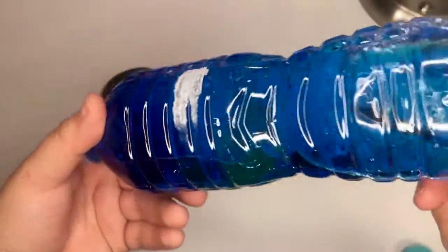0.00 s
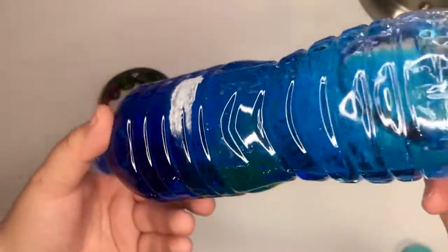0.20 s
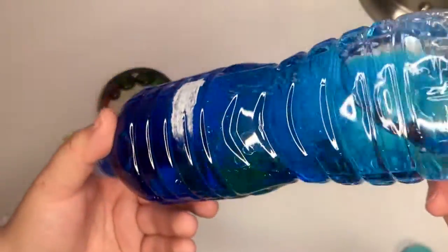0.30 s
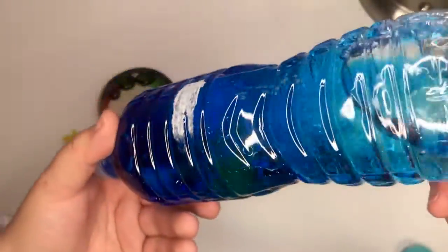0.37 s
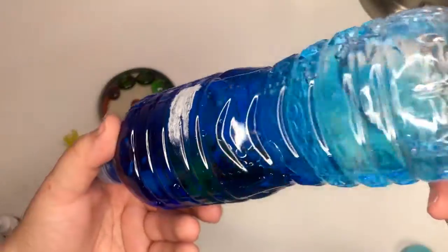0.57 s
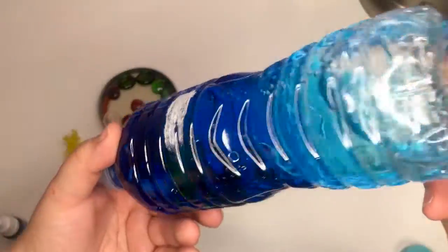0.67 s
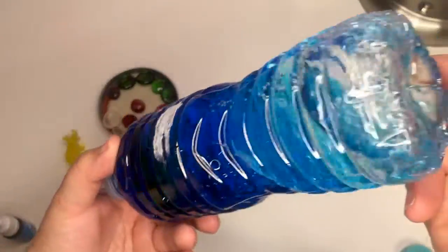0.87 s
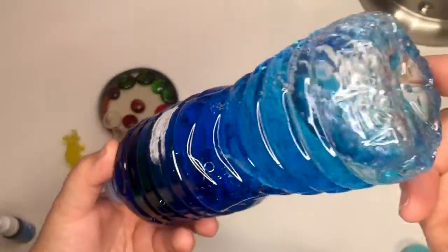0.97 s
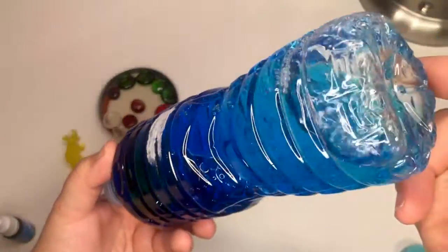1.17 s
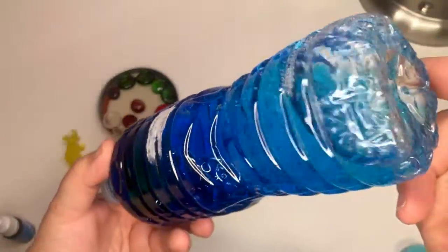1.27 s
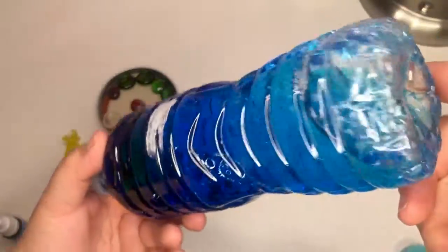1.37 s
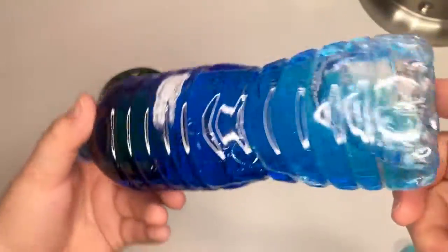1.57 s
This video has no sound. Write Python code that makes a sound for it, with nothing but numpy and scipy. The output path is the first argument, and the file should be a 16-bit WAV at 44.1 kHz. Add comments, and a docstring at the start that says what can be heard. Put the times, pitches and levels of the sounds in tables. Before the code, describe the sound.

A water-filled plastic bottle is tipped, its pebbles rattling down the ribbed wall in one quick burst

```python
"""A mains hum over broad room noise is heard first; then a water-filled plastic bottle is tilted by hand
above a table, and pebbles slide down its ribbed wall. Random contacts excite its damped modes as a rumble.
Noise bursts ring resonances of the wall as dull knocks and low bumps; cracks of noise with a short ring
are the bright clacks. Impulses in the deepest mode are heavy thumps, and a diffuse tail follows the hits."""
import sys
import numpy as np
from scipy import signal
from scipy.fft import rfft, irfft
from scipy.io import wavfile
from scipy.ndimage import uniform_filter1d

SR = 44100
rng = np.random.default_rng(int(sys.argv[2]) if len(sys.argv) > 2 else 0)


def ratio(d):
    """dB to gain"""
    e = np.asarray(d, float) / 20
    return 10 ** e


def file_out(sig):
    """Save sig as 16-bit WAV at sys.argv[1]."""
    # one column per channel
    cols = np.atleast_2d(sig).T
    # limit, then scale
    lim = np.clip(cols, -1, 1)
    pcm = np.round(lim * 32767).astype(np.int16)
    wavfile.write(sys.argv[1], SR, pcm)


N = 70560  # samples, 1.6 s


def rms_one(x):
    """Normalization: scales a signal to unit root-mean-square."""
    return x / np.sqrt(np.mean(x ** 2) + 1e-20)


def cut(x, hz, kind, order=2):
    """Butterworth filtering: a maximally flat passband above or below a corner."""
    return signal.sosfilt(signal.butter(order, hz, kind, fs=SR, output="sos"), x)


def ring(drive, hz, t60):
    """Damped resonance: a unit click sets a decaying sine of height 1 ringing."""
    radius = ratio(-60 / (t60 * SR))
    angle = 2 * np.pi * hz / SR
    poles = [1, -2 * radius * np.cos(angle), radius * radius]
    return signal.lfilter([0, np.sin(angle)], poles, drive + 1e-18)


def add(out, s, sound):
    """Superposition: adds a sound from its onset, cut off at the end of the scene."""
    i = int(s * SR)
    out[i:i + len(sound)] += sound[:N - i]


# Spectrum of the room noise, interpolated over log frequency: (f/Hz, relative level per Hz/dB)
ROOM_SPECTRUM = [(15, -19), (25, -4.5), (70, -6), (124, -10.5), (172, -14), (339, -18.5), (433, -22.5),
                 (1830, -37), (16500, -44)]
ROOM_DB = -55.5  # rms
HUM_HZ, HUM_DB = 119.53, -53.5  # dB: rms of the steady tone
HUM_WIDTH_HZ, HUM_ROUGH = 20, 0.34  # half-width of the noise about the tone, its rms relative to the tone


def room():
    """Stationary background: spectrally shaped noise and a hum, a sine plus narrow-band noise."""
    hz = np.fft.rfftfreq(N, 1 / SR) + 1  # 1 Hz up, to keep the logarithm finite
    point_hz, point_db = np.transpose(ROOM_SPECTRUM)
    shape = ratio(np.interp(np.log(hz), np.log(point_hz), point_db))
    air = irfft(rfft(rng.standard_normal(N)) * shape, N)
    resonance = 1 + ((hz - HUM_HZ) / HUM_WIDTH_HZ) ** 2
    waver = irfft(rfft(rng.standard_normal(N)) / resonance, N)
    tone = np.sqrt(2) * np.sin(2 * np.pi * HUM_HZ * np.arange(N) / SR)
    hum = tone + HUM_ROUGH * rms_one(waver)
    return ratio(ROOM_DB) * rms_one(air) + ratio(HUM_DB) * hum


def grains(per_s, spread_db):
    """Random point process: clicks of uneven size and sign at a mean rate."""
    size = ratio(spread_db * np.minimum(rng.exponential(1, N), 4))
    sign = rng.choice([-1, 1], N)
    return size * sign * (rng.random(N) < per_s / SR)


def dealt(clicks, low_hz, high_hz, cycles, count):
    """Resonator bank: each click rings at one of several pitches for a few cycles."""
    choice = rng.integers(0, count, N)
    pitches = np.geomspace(low_hz, high_hz, count)
    return sum(ring(clicks * (choice == k), hz, cycles / hz) for k, hz in enumerate(pitches))


# Modes of the bottle: (f/Hz, relative level/dB, t60/s)
BOTTLE_MODES = [(466, 4.5, 0.039), (658, 3.5, 0.035), (772, -3, 0.03), (1000, 6.5, 0.014), (1173, 1, 0.017),
                (1368, 2.5, 0.014), (1608, -4, 0.023)]
# Deep modes of the water-laden bottle, the deepest first: (f/Hz, relative level/dB, t60/s)
DEEP_MODES = [(173.8, 2.5, 0.1), (319.6, -5, 0.13)]


def bottle(clicks, modes):
    """Modal superposition: each contact excites every mode with a strength of its own."""
    return sum(ratio(db) * ring(clicks * rng.standard_normal(N), hz, t60) for hz, db, t60 in modes)


# Rms levels of the sliding pebbles, interpolated over time:
# (t/s, rumble level/dB, deep-mode level/dB, small-knock level/dB, tick level/dB)
SLIDE_LEVELS = [(0.059, -78, -62, -68.5, -82), (0.132, -63.5, -79, -66.5, -75),
                (0.191, -65, -84, -62.5, -71), (0.208, -46, -70, -52.5, -82), (0.276, -47, -52, -52, -63.5),
                (0.388, -44, -47.5, -50, -61.5), (0.626, -42, -49, -48, -62), (0.722, -39, -40, -52, -50.5),
                (0.766, -42.5, -53.5, -70, -44.5), (0.824, -35.5, -45.5, -53, -53),
                (0.85, -49.5, -54, -52, -47), (0.916, -43.5, -53.5, -66, -50),
                (0.992, -61, -60.5, -87, -66.5), (1.03, -45.5, -63, -53.5, -72),
                (1.081, -60, -60, -97, -64)]
RUMBLE_PER_S, KNOCKS_PER_S, TICKS_PER_S = 600, 800, 4000  # mean contact rates


def slide():
    """Stochastic excitation: dense contacts rumble in the modes; small knocks and ticks ride on them."""
    s, *columns = np.transpose(SLIDE_LEVELS)
    t = np.arange(N) / SR
    low, deep, mid, high = [ratio(np.interp(t, s, c, left=-99, right=-99)) for c in columns]
    contacts = grains(RUMBLE_PER_S, spread_db=2.5)
    rumble = low * rms_one(cut(bottle(contacts, BOTTLE_MODES), 328, "high"))
    rumble += deep * rms_one(cut(bottle(contacts, DEEP_MODES), 160, "high"))
    small = dealt(grains(KNOCKS_PER_S, spread_db=3.5), 2460, 3620, cycles=9.0, count=24)
    ticks = dealt(grains(TICKS_PER_S, spread_db=1.5), 4200, 11200, cycles=6.0, count=24)
    patter = mid * rms_one(small) + high * rms_one(cut(ticks, 3000, "high"))
    return rumble, patter


TAIL_DB, TAIL_T60_S, TAIL_HZ = -34.5, 0.095, 7160  # initial gain on the noise, decay, treble corner


def surroundings(x):
    """Diffuse reverberation: convolution with decaying noise for the table and walls."""
    t = np.arange(int(.15 * SR)) / SR
    noise = cut(rng.standard_normal(len(t)), TAIL_HZ, "low", order=1)
    noise = cut(noise, 193, "high")
    decay = ratio(TAIL_DB - 60 * t / TAIL_T60_S) * (t > .002)  # silent for the first 2 ms
    return x + signal.fftconvolve(x, noise * decay)[:N]


# Dull knocks of pebbles on the wall: (t/s, peak level/dB, f/Hz)
KNOCK_EVENTS = [(0.169, -39.5, 1290), (0.2027, -32, 2350), (0.2141, -30, 2660), (0.2344, -33.5, 2560),
                (0.2558, -30, 2800), (0.338, -35, 2740), (0.3752, -26.5, 2570), (0.3965, -25, 2580),
                (0.4419, -33, 2660), (0.4505, -28.5, 2950), (0.4853, -27, 2160), (0.5106, -28, 2970),
                (0.5693, -29, 3200), (0.5781, -25, 3140), (0.6775, -36, 3270), (0.7125, -31, 2900),
                (0.779, -28, 3280)]
KNOCK_T60_S, KNOCK_RATTLE_S = 0.0077, 0.015  # decay of the ring, and of the contact (60 dB)


def knocks():
    """Forced resonance: a short rattle of contact rings four resonances of the wall."""
    out, t = np.zeros(N), np.arange(3000) / SR
    for s, db, hz in KNOCK_EVENTS:
        touch = rng.standard_normal(len(t)) * ratio(-60 * t / KNOCK_RATTLE_S)
        tone = ring(touch, hz, KNOCK_T60_S)
        tone += 0.92 * ring(touch, 1.37 * hz, 0.21 * KNOCK_T60_S)
        tone += 0.5 * ring(touch, 0.65 * hz, 0.21 * KNOCK_T60_S)
        tone += 0.47 * ring(touch, 0.547 * hz, KNOCK_T60_S)
        add(out, s, ratio(db) * tone / np.abs(tone).max())
    return out


# Low bumps of the shifting contents: (t/s, peak level/dB, f/Hz)
BUMP_EVENTS = [(0.206, -41, 379), (0.236, -37, 373), (0.324, -38, 386), (0.39, -37, 355), (0.566, -35, 393),
               (0.585, -33, 391), (0.644, -30, 484), (0.703, -27, 479), (0.783, -34.5, 462),
               (0.812, -32, 531), (0.888, -33, 523), (0.915, -38, 465), (0.952, -36.5, 497),
               (1.031, -38.5, 460), (1.478, -51.5, 604)]
BUMP_T60_S, BUMP_RATTLE_S = 0.085, 0.029  # decay of the ring, and of the contact (60 dB)
BUMP_UPPER_HZ, BUMP_UPPER_DB = 672.3, -8.5  # higher mode, gain relative to the lower


def bumps():
    """Forced resonance: a lump of pebbles and water rings the wall at its own pitch and a higher mode."""
    out, t = np.zeros(N), np.arange(5000) / SR
    for s, db, hz in BUMP_EVENTS:
        touch = rng.standard_normal(len(t)) * ratio(-60 * t / BUMP_RATTLE_S)
        touch = cut(touch, 0.85 * hz, "high")
        tone = ring(touch, hz, BUMP_T60_S)
        tone += ratio(BUMP_UPPER_DB) * ring(touch, BUMP_UPPER_HZ, BUMP_T60_S)
        add(out, s, ratio(db) * tone / np.abs(tone).max())
    return out


def evened(x):
    """Spectral whitening: levels the spectrum on the broad scale."""
    bins = rfft(x)
    return irfft(bins / uniform_filter1d(np.abs(bins), size=60), len(x))


# Bright clacks of pebbles: (t/s, peak level of the crack/dB, ring f/Hz, ring level relative to crack/dB)
CLACK_EVENTS = [(0.219, -44.5, 6900, 6.5), (0.241, -36, 7160, 5.5), (0.2803, -35, 8800, -5),
                (0.2986, -32, 5200, 1), (0.359, -30, 5300, -0.5), (0.376, -40, 4600, 2),
                (0.397, -25.5, 5700, -2), (0.483, -30.5, 4080, 3.5), (0.5466, -9, 9150, -10.5),
                (0.591, -36, 4500, 2.5), (0.6202, -16.5, 5300, -3.5), (0.6378, -24.5, 6860, 3.5),
                (0.6548, -26, 4800, -10), (0.6622, -26, 4090, -6), (0.6814, -13, 5070, -3.5),
                (0.695, -20, 8800, 2), (0.7045, -22.5, 4550, -8), (0.7222, -17.5, 6900, -11),
                (0.731, -31, 6900, 9.5), (0.7321, -34, 6800, -3), (0.741, -22, 4300, -22),
                (0.750, -32.5, 4530, 4), (0.7563, -23, 5100, -7), (0.7752, -30, 7800, 4),
                (0.7874, -23.5, 9500, 0), (0.8008, -18.5, 5170, -7.5), (0.8158, -10.5, 8200, -4.5),
                (0.8245, -22, 5250, 2), (0.835, -24, 9150, -0.5), (0.845, -19, 5260, -2),
                (0.8656, -21.5, 5240, -4.5), (0.8738, -30, 7560, 3), (0.8797, -25.5, 5460, 1),
                (0.9029, -17, 8880, 0), (0.9411, -21, 5940, -7.5), (0.9982, -36.5, 6300, 1),
                (1.0155, -40, 2480, 1), (1.0197, -37.5, 7050, 0), (1.0314, -29, 8700, -11),
                (1.0549, -41.5, 5760, 9.5)]
CLACK_T60_S, CLACK_RING_CYCLES = 0.0039, 5.6  # decay of the crack, cycles in which the ring falls 60 dB
SPIKE = 15.6  # height of a crack's first instant over its noise
TABLE_ECHO_S, ECHO_SPREAD, TABLE_ECHO_DB = 0.0013, 0.13, 4  # mean delay, relative deviation, gain
SCATTER_DB, SCATTER_T60_S = -2.5, 0.025
CRACK_CUT_HZ, TOP_OCTAVE_HZ = 13960, 10500  # upper limit of the crack, lower edge of its top octave
TOP_OCTAVE_DB, TOP_FOLLOWS = 6, 0.39  # top-octave gain of a 0 dB clack, dB gained per dB of clack
THUD_DB = -29.5  # what a clack gives to the bottle's modes


def clacks():
    """Impact radiation: a noise crack, its table echo, scattered tail and ring; each rings the bottle."""
    out, thuds, t = np.zeros(N), np.zeros(N), np.arange(1500) / SR
    fade = ratio(-60 * t / CLACK_T60_S)
    for s, db, hz, ring_db in CLACK_EVENTS:
        crack, scratch, scatter = rng.standard_normal((3, len(t)))
        delay = TABLE_ECHO_S * (1 + ECHO_SPREAD * rng.standard_normal())
        late = np.interp(t - delay, t, np.arange(len(t)), left=-1).astype(int)  # -1: echo not yet there
        tail = scatter * ratio(SCATTER_DB - 60 * t / SCATTER_T60_S)

        def echoed(direct):
            """Reflection: the direct sound, its delayed copy and the scattered tail."""
            return direct + ratio(TABLE_ECHO_DB) * direct[late] * (late >= 0) + tail

        tone = ring(echoed(scratch * fade), hz, CLACK_RING_CYCLES / hz)
        snap = cut(evened(echoed(crack * fade + SPIKE * (t == 0))), 2630, "high")
        top = cut(cut(snap, TOP_OCTAVE_HZ, "high"), CRACK_CUT_HZ, "low")
        # louder clacks are brighter
        snap = cut(snap, TOP_OCTAVE_HZ, "low") + ratio(TOP_OCTAVE_DB + TOP_FOLLOWS * db) * top
        sound = ratio(ring_db) * tone / np.abs(tone).max() + snap / np.abs(snap).max()
        add(out, s, ratio(db) * sound)
        thuds[int(s * SR)] = ratio(db + THUD_DB)
    return out + bottle(thuds, BOTTLE_MODES)


# Heavy thumps in the deepest mode: (t/s, level of the driving impulse/dB)
THUMP_EVENTS = [(0.705, -24), (0.804, -28.5)]


def thumps():
    """Impulse response: the load drops and rings the deepest mode, filtered close to its pitch."""
    drops = np.zeros(N)
    hz, _, t60 = DEEP_MODES[0]
    for s, db in THUMP_EVENTS:
        drops[int(s * SR)] = ratio(db)
    return cut(cut(ring(drops, hz, t60), 2.3 * hz, "low"), hz / 0.99, "high")


def scene():
    """Superposition: all sources add, and the clacks, knocks and patter also reverberate."""
    background = room()
    rumble, patter = slide()
    hits = patter + knocks() + clacks()
    return (background + rumble + surroundings(hits) + bumps() + thumps())[None]


def top_cut(x):
    """Nothing passes above the cut-off."""
    return signal.sosfilt(signal.butter(12, 17060, fs=SR, output="sos"), x)


def record(dry):
    """Band limitation: a steep low-pass removes the top and a high-pass the bass."""
    low_pass = signal.cheby2(12, 30, 16100, fs=SR, output="sos")  # 30 dB down from 16100 Hz
    mix = cut(signal.sosfilt(low_pass, dry), 47.4, "high", order=3)
    return top_cut(mix)


dry = scene()
out = record(dry)
file_out(out)
```